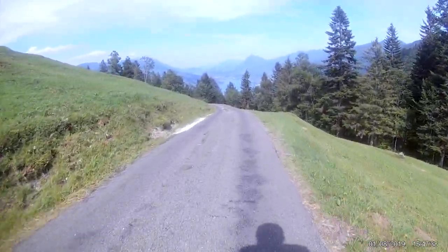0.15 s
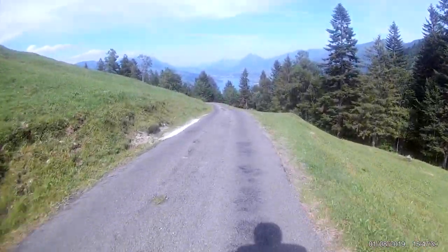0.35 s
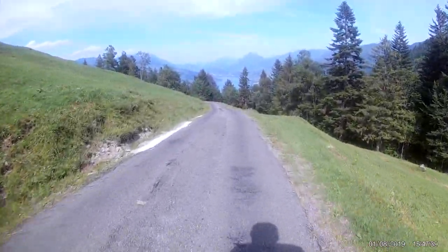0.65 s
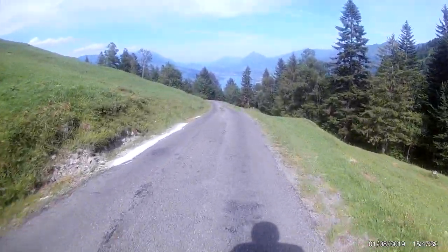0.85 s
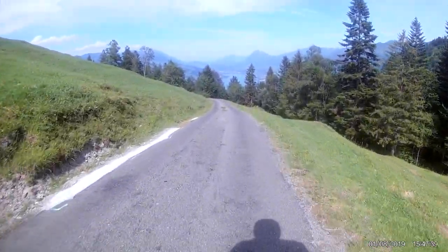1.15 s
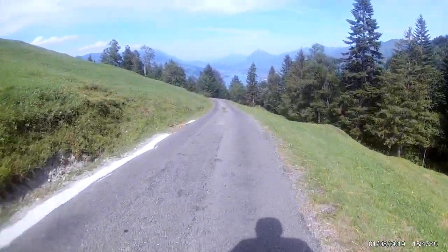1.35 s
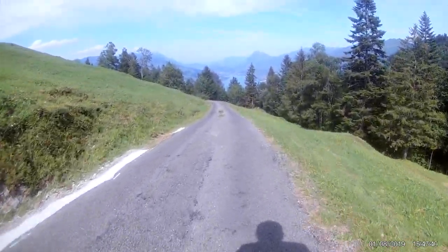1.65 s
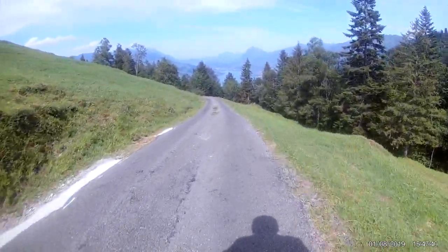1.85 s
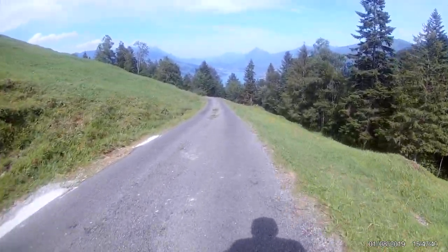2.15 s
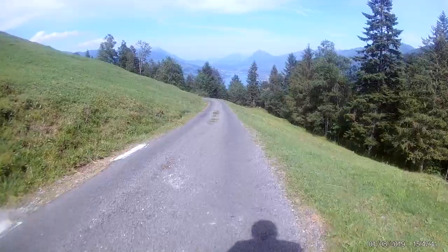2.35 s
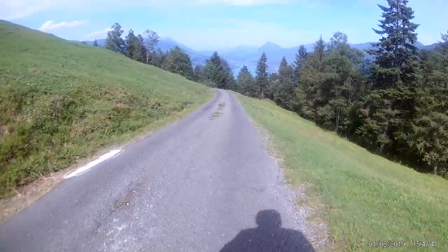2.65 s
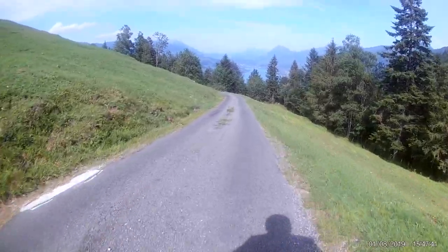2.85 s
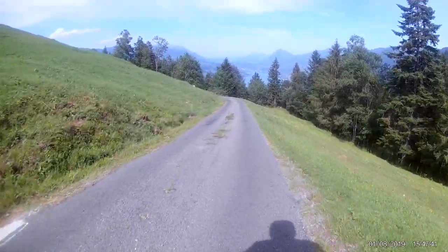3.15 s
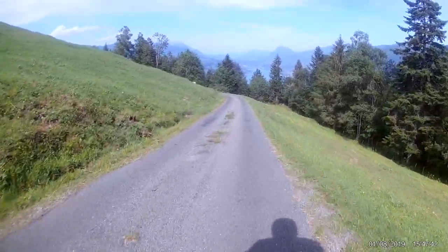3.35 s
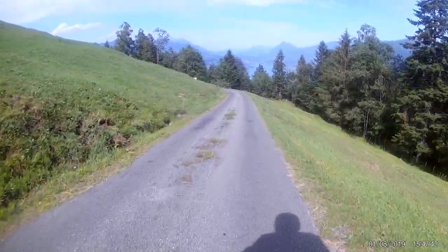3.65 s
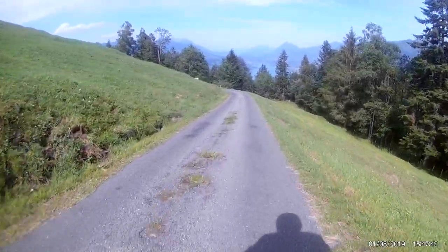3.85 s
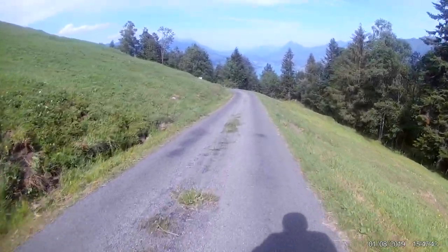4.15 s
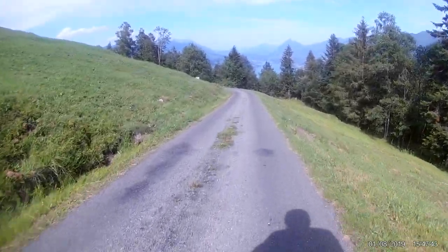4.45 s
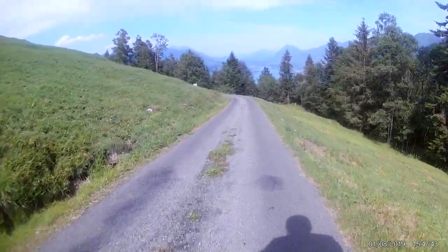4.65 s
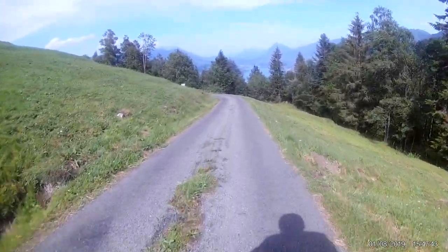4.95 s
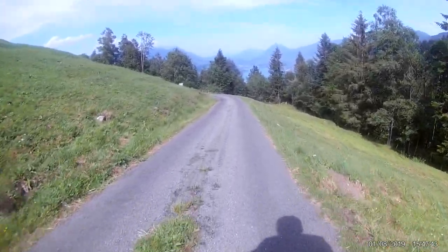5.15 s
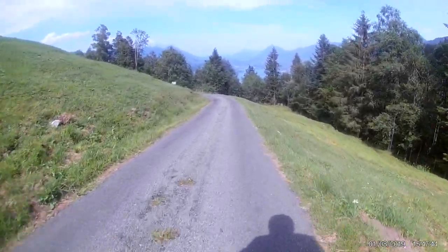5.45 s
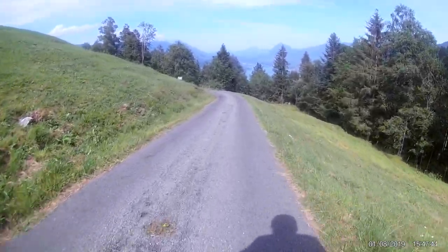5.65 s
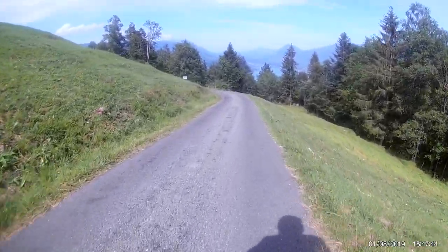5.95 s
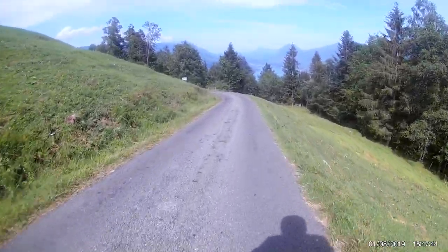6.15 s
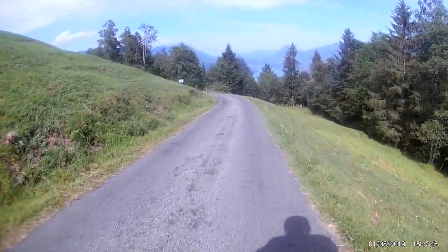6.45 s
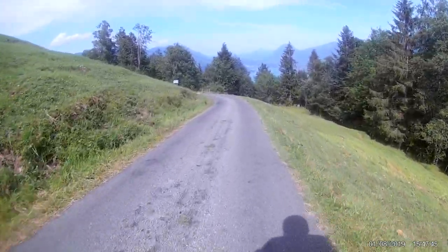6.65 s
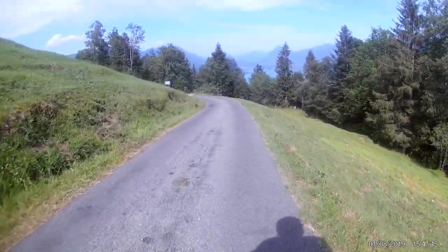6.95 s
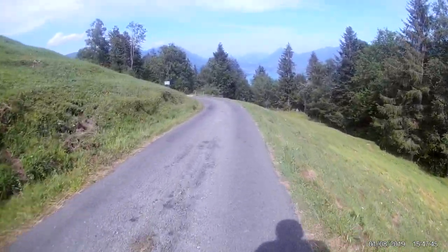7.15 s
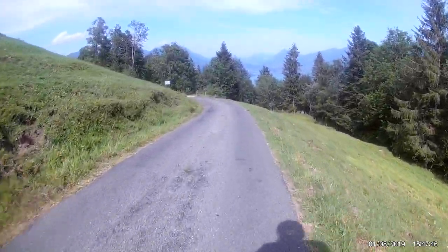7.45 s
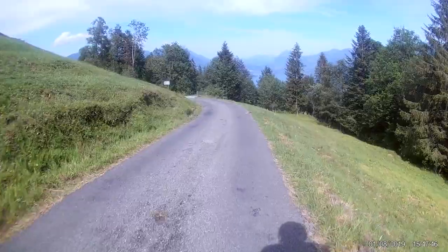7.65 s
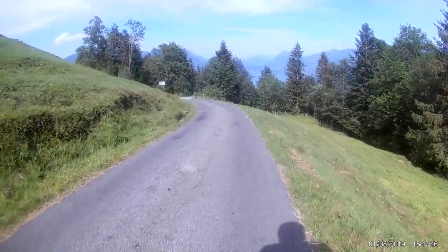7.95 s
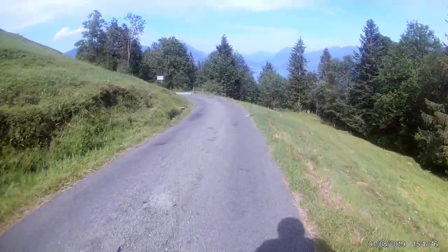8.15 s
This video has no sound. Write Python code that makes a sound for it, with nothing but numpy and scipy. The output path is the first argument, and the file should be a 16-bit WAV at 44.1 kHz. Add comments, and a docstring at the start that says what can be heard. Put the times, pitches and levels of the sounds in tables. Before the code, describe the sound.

From a microphone fixed to a bicycle rolling down a paved hillside road, a dragging disc brake rings without pause, a rough, noisy squeal around 1.3 kHz. Loud low tyre rumble fills the bass with faint wind buffeting beneath. Tiny purer squeaks flash out, a few small bumps knock the frame, and the overloaded input crackles in the treble.

```python
"""A dragging disc brake rings, loudest near 1.3 kHz, on a bicycle rolling down a steep road, heard from the bike.
Pad friction is rough noise through rotor and fork resonances; brief near-pure tone swells, windowed sines,
stand out of the ringing noise near 1.3 kHz. Road bumps knock the frame modes; tyre rumble and wind, both
shaped noise, fill the bass. The sum overloads the input stage, whose clipped tops crackle in the treble."""
import sys
import numpy as np
from scipy import signal
from scipy.fft import rfft, irfft, next_fast_len
from scipy.io import wavfile

SR = 44100
rng = np.random.default_rng(int(sys.argv[2]) if len(sys.argv) > 2 else 0)


def generate_wav(signal):
    """Clip the signal to [-1, 1] and save it as 16-bit WAV at the path in sys.argv[1]."""
    frames = np.transpose(np.atleast_2d(signal))
    scaled = np.clip(frames, -1, 1) * 32767
    pcm = np.round(scaled).astype(np.int16)
    wavfile.write(sys.argv[1], SR, pcm)


N = 365588

# Slow, uneven wander in the levels of the tyre rumble and the ringing pads.
# Each row: time in seconds, tyre rumble level in dB, level of pads on rotor in dB.
LEVEL_WANDER = [(0, -8.5, -15.5), (.3, -11.5, -18), (.45, -9, -14.5), (.62, -10, -15.5), (.9, -7.5, -13.5),
                (1.4, -8.5, -14), (1.9, -9, -15), (2.25, -12.5, -16.5), (2.5, -9.5, -13.5),
                (2.75, -9.5, -14.5), (2.95, -8.5, -15), (3.27, -11.5, -17.5), (3.47, -9.5, -15),
                (3.95, -11, -15.5), (4.08, -7.5, -13), (4.55, -9.5, -14), (4.88, -8.5, -15),
                (5.05, -9, -14), (6.0, -9, -13.5), (6.9, -6.5, -13.5), (7.05, -9.5, -13.5),
                (7.4, -7.5, -11.5), (8.29, -9, -13.5)]


def from_db(db):
    """dB to amplitude gain."""
    return 10 ** (np.asarray(db) / 20)


def rms_one(x):
    """Scale to unit rms."""
    return x / np.sqrt(np.mean(x ** 2) + 1e-20)


def in_time(rows):
    """Interpolate each column after the time column to one value a sample."""
    time_s, *columns = np.transpose(rows)
    return [np.interp(np.arange(N) / SR, time_s, column) for column in columns]


def drift(corner_hz):
    """Slow random curve of rms 1: noise through two equal one-pole low-passes."""
    step = 40  # samples per control value
    run_in = 2000  # control values dropped while the filter settles
    pole = np.exp(-2 * np.pi * corner_hz * step / SR)
    noise = rng.standard_normal(N // step + run_in + 2)
    slow = signal.lfilter([1], [1, -2 * pole, pole ** 2], noise)[run_in:]
    return np.interp(np.arange(N) / step, np.arange(len(slow)), rms_one(slow))


def resonance(x, hz, width_hz):
    """Two-pole band-pass, about unit gain at its peak."""
    radius = np.exp(-np.pi * width_hz / SR)
    zeros = np.array([1, 0, -1]) * (1 - radius ** 2) / 2
    poles = [1, -2 * radius * np.cos(2 * np.pi * hz / SR), radius ** 2]
    return signal.lfilter(zeros, poles, x)


def twice_resonant(x, hz, width_hz):
    """Two passes of one resonance: steeper skirts keep the valleys between modes deep."""
    return resonance(resonance(x, hz, width_hz), hz, width_hz)


def coloured(points):
    """Unit-rms noise shaped by (Hz, dB) points on a log-frequency axis."""
    size = next_fast_len(N)
    bin_hz = np.maximum(np.arange(size // 2 + 1) * SR / size, 1)
    point_hz, point_db = np.transpose(points)
    shape_db = np.interp(np.log(bin_hz), np.log(point_hz), point_db, left=-80, right=-80)
    spectrum = rfft(rng.standard_normal(size)) * from_db(shape_db)
    return rms_one(irfft(spectrum, size)[:N])


def brake():
    """Pad friction: noise of uneven grip drives rotor, fork and frame modes, each swelling on its own."""
    # Each row: resonance in Hz, width of one pass in Hz, relative level in dB.
    rotor_modes = [(466.8, 30.8, -4), (741, 80, -13.5), (924, 71, -16), (1237.6, 65, -3), (1292.4, 74.4, 0),
                   (1379, 106, -5), (1471.5, 110, -9), (1650, 220, -16.5), (1844, 140, -15),
                   (2230, 300, -46), (3050, 490, -35.5), (4030, 390, -38.5), (4380, 490, -37.5),
                   (4845, 150, -40.5), (5770, 450, -47), (6370, 570, -54)]
    grip_db, grip_hz = 0.66, 51
    swell_db, swell_hz = 0.46, 13.0
    grip = from_db(grip_db * drift(grip_hz))
    ringing = np.zeros(N)
    for hz, width_hz, level_db in rotor_modes:
        friction = rng.standard_normal(N) * grip
        gain = from_db(level_db + swell_db * drift(swell_hz))
        ringing += gain * twice_resonant(friction, hz, width_hz)
    pads_db = in_time(LEVEL_WANDER)[1]
    return from_db(pads_db) * rms_one(ringing)


def tone_swells():
    """Brief near-pure tones, windowed sines, stand out of the ringing noise near 1.3 kHz."""
    # Each row: start in seconds, peak level in dB, pitch in Hz, length in seconds.
    swell_rows = [(0.113, -12, 1305, 0.019), (0.378, -11.5, 1335, 0.019), (1.312, -7.5, 1295, 0.029),
                  (1.399, -4.5, 1340, .016), (2.42, -10, 1285, 0.03), (2.968, -0.5, 1350, .013),
                  (4.381, -6.5, 1330, 0.015), (4.496, -6, 1323, 0.02), (5.029, -6.5, 1255, 0.029),
                  (7.01, -8, 1302, 0.044), (7.457, -5.5, 1287, 0.015), (7.773, -7, 1260, 0.014),
                  (8.052, -8, 1240, .025)]
    out = np.zeros(N)
    for start_s, peak_db, hz, length_s in swell_rows:
        t = np.arange(round(length_s * SR)) / SR
        start = round(start_s * SR)
        swell = np.hanning(len(t)) ** 0.75
        tone = np.sin(2 * np.pi * (hz * t + rng.random()))  # random starting phase
        out[start:start + len(t)] += from_db(peak_db) * swell * tone
    return out


def bumps():
    """Road bumps: each kicks the decaying frame modes with a few ms of noisy rattle."""
    # Each row: start in seconds, rattle level in dB.
    bump_rows = [(1.396, -30), (2.062, -26.5), (2.478, -36), (2.823, -40), (3.47, -33), (6.2203, -45)]
    # Each row: frame mode in Hz, relative level in dB, 60 dB decay time in seconds.
    frame_modes = [(1100, -3, 0.029), (1540, -4.5, 0.045), (2810, -18, .03), (4100, -12.5, 0.02)]
    size, decay_samples = 400, 120.0
    envelope = np.exp(-np.arange(size) / decay_samples)
    kicks = np.zeros(N)
    for start_s, rattle_db in bump_rows:
        start = round(start_s * SR)
        kicks[start:start + size] += from_db(rattle_db) * rng.standard_normal(size) * envelope
    kicks += 1e-18  # keeps the filters out of denormals
    out = np.zeros(N)
    for hz, level_db, t60_s in frame_modes:
        radius = 10 ** (-3 / (t60_s * SR))
        w = 2 * np.pi * hz / SR
        poles = [1, -2 * radius * np.cos(w), radius ** 2]
        out += from_db(level_db) * signal.lfilter([0, np.sin(w)], poles, kicks)
    return out


def tyres():
    """Tyre rumble through the frame: shaped noise plus low resonances that swell independently."""
    # Each row: frequency in Hz, relative spectrum level in dB per Hz.
    rumble_spectrum = [(60, -21), (100, -9.5), (125, -5), (175, -1), (230, -3), (320, -3), (430, -8),
                       (520, -16.5), (700, -25), (1000, -39.5), (1600, -50)]
    # Low frame resonances. Each row: frequency in Hz, width of one pass in Hz, mean level in dB.
    low_modes = [(134.9, 33.5, -10.5), (175.2, 37.2, -9.5), (209.3, 38, -13), (318.5, 29, -11.5),
                 (373.6, 32, -14.5)]
    swell_db, swell_hz = 2.27, 1.4
    rough_db, rough_hz = 0.73, 11.8  # faster random unevenness of the rumble
    rumble = coloured(rumble_spectrum)
    for hz, width_hz, level_db in low_modes:
        shaking = twice_resonant(rng.standard_normal(N), hz, width_hz)
        rumble += from_db(level_db + swell_db * drift(swell_hz)) * rms_one(shaking)
    tyre_db = in_time(LEVEL_WANDER)[0] + rough_db * drift(rough_hz)
    return from_db(tyre_db) * rms_one(rumble)


def wind():
    """Wind buffeting: deep shaped noise with slow random gusts in level."""
    mean_db, gust_db, gust_hz = -26.5, 1.1, 1.5
    buffet = coloured([(12, -12), (30, -3.5), (45, 2.0), (90, 1.5), (140, -13.5)])  # (Hz, dB)
    return from_db(mean_db + gust_db * drift(gust_hz)) * buffet


def scene():
    """Sum of all sources at the microphone fixed to the bike, one channel."""
    return (brake() + tone_swells() + bumps() + tyres() + wind())[None]


def record(dry):
    """Input stage clips flat; a steep elliptic low-pass then cuts the top."""
    clip_level, cutoff_hz = 0.67, 15800
    clipped = np.clip(dry, -clip_level, clip_level)
    sos = signal.ellip(12, 0.2, 60, cutoff_hz, fs=SR, output="sos")  # order, ripple dB, stopband dB
    settled = signal.sosfilt_zi(sos)[:, None] * clipped[0, 0]  # no start-up transient
    return signal.sosfilt(sos, clipped, zi=settled)[0]


dry = scene()
out = record(dry)
generate_wav(out)
```